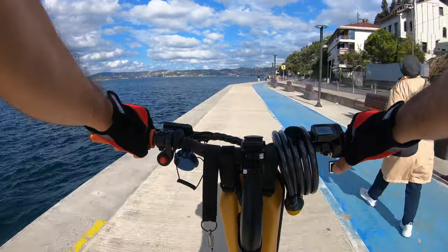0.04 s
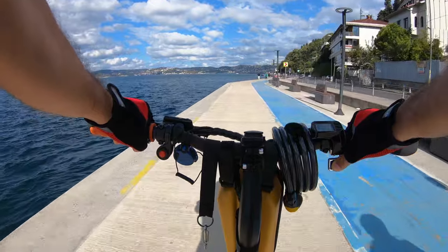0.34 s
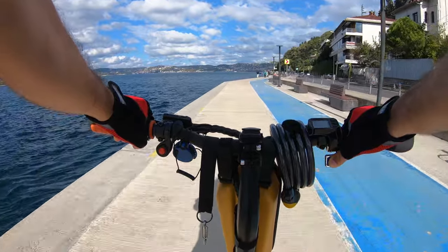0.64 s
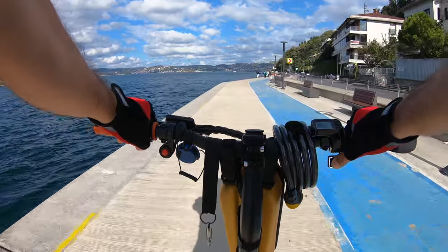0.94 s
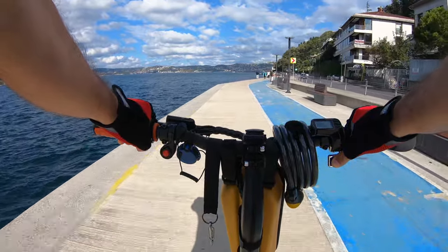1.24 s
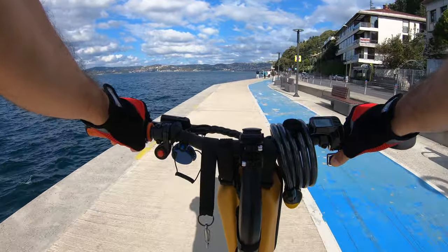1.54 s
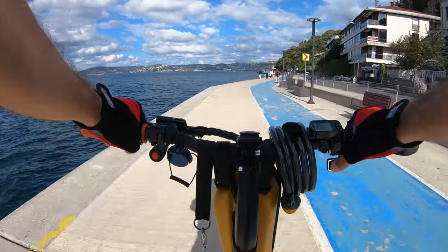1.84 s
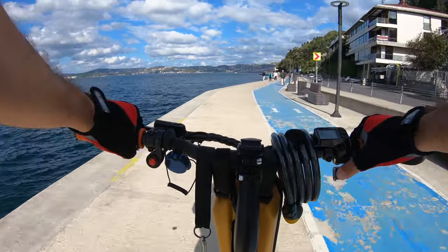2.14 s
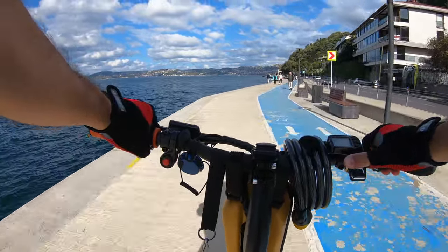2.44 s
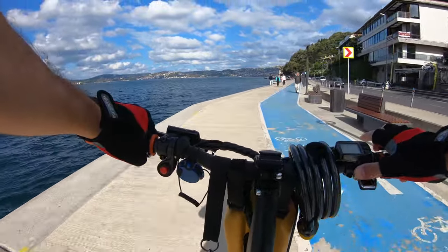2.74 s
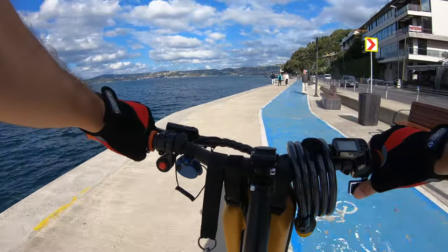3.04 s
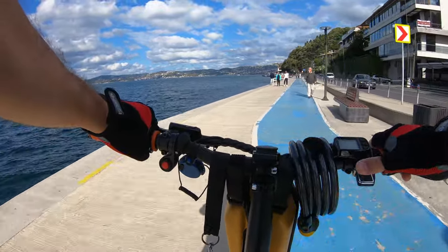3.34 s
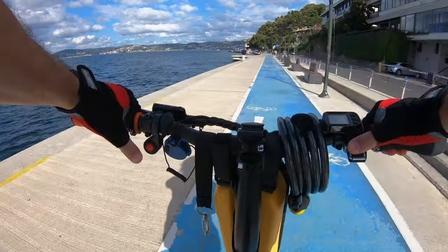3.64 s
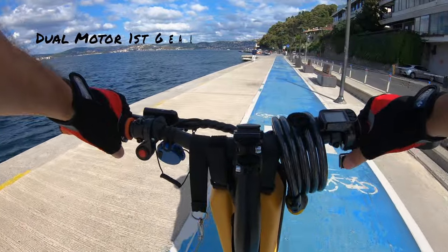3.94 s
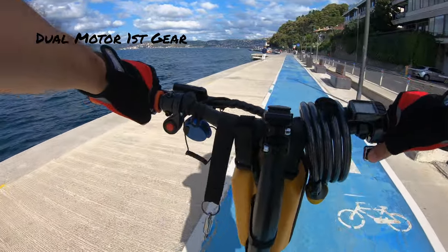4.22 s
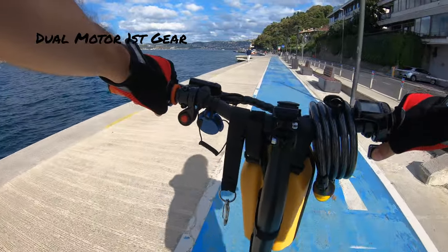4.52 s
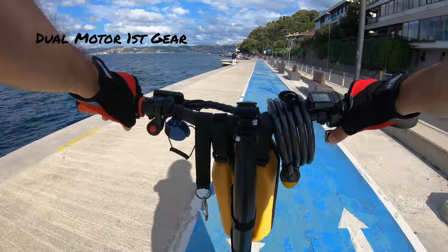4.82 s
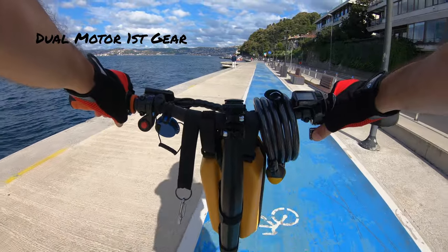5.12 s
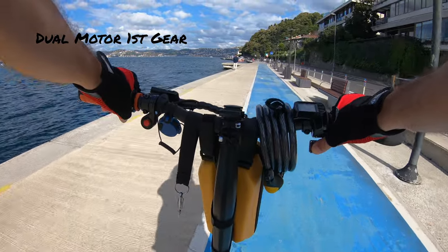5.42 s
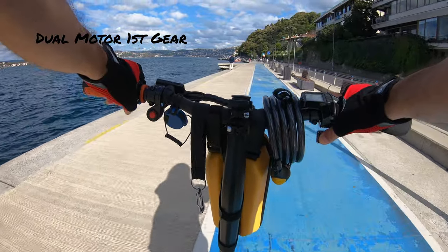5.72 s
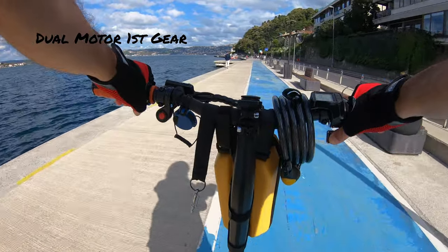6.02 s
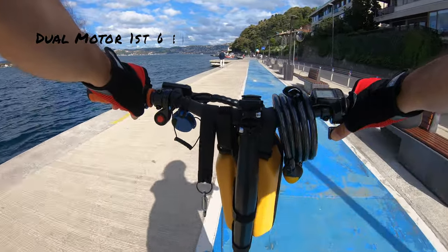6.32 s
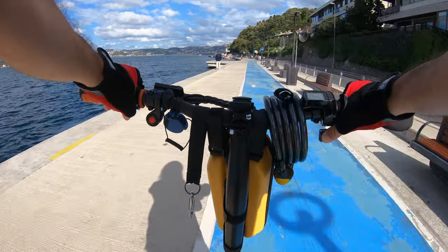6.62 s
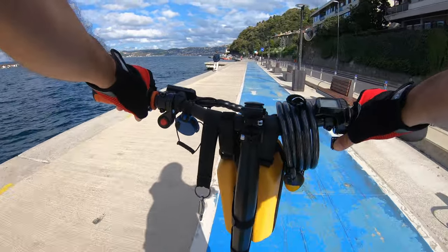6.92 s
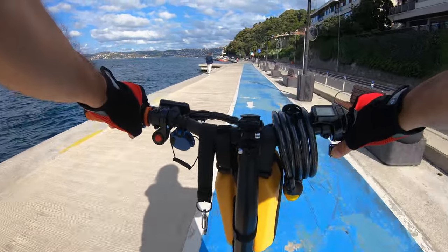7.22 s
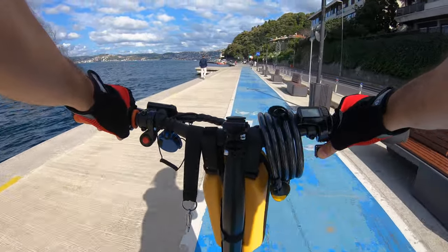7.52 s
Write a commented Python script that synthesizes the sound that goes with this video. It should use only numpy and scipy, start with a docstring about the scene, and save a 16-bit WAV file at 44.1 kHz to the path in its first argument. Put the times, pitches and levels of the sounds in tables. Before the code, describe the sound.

An electric scooter runs fast along an outdoor concrete path, heard from the rider's chest. Wind buffets the microphone with low thumps over a steady motor hum, thin gliding whines and tyre roar. About halfway, a sharp click cuts to ribbed concrete, where the frame drones and the tyres sing lower. Small metal parts clink and rattle lightly around the change, and the ride carries on.

```python
"""An electric scooter runs fast along a concrete seaside path, heard from the rider's chest.
From the start, wind buffets the microphone over humming hub motors, gliding whines and tyre roar.
Gusts thump, the running gear scrapes, handlebar fittings tick; from 3.1 s metal parts clink.
At 3.65 s the sound cuts with a click to a second stretch: ribbed concrete sets the frame droning,
the tyres sing lower and small parts rattle."""
import sys
import numpy as np
from scipy import signal
from scipy.fft import rfft, irfft
from scipy.io import wavfile
from scipy.ndimage import uniform_filter1d

SR = 44100
rng = np.random.default_rng(int(sys.argv[2]) if len(sys.argv) > 2 else 0)


def store_pcm(level_fs):
    """Save levels as 16-bit WAV."""
    pcm = np.round(np.clip(level_fs, -1, 1) * 32767).astype(np.int16)
    wavfile.write(sys.argv[1], SR, np.atleast_2d(pcm).T)


N = 338247
TIME_S = np.arange(N) / SR
FREQ_HZ = np.fft.rfftfreq(N, 1 / SR)
RIBBED_START_S = 3.65

# Table levels are relative; the functions add their own gains.
# airflow at the microphone: time_s, level_db
WIND_LEVEL = [(0, -24.5), (.25, -24.5), (.55, -26.5), (.8, -24.5), (1.1, -23), (1.6, -23), (1.8, -29),
              (2.15, -24.5), (2.35, -26), (2.8, -22), (3.2, -26.5), (3.65, -24.5), (3.8, -28), (4.3, -28.5),
              (4.7, -27), (4.93, -35.5), (5.25, -27), (5.7, -31), (5.95, -30.5), (6.15, -28), (6.9, -27.5),
              (7.5, -24.5), (7.67, -30)]
# eddy spectra, deeper on the smooth stretch: freq_hz, gain_db
SMOOTH_WIND_SPECTRUM = [(8, -15), (15, -1), (28, 2), (48, -2.5), (62, -9.5), (80, -12.5), (110, -11.5),
                        (135, -19.5), (160, -29), (250, -43.5)]
RIBBED_WIND_SPECTRUM = [(8, -13), (20, -9), (32, 2), (48, -0.5), (62, 0.5), (80, -2), (105, -5),
                        (135, -11.5), (160, -21), (250, -28.5)]
# hub motor hum: time_s, fundamental_db, octave_db
HUM_LEVELS = [(0, -21, -43.5), (.6, -21, -37), (.85, -29.5, -35), (1.6, -26, -44.5), (1.85, -24, -38.5),
              (2.38, -24.5, -34), (2.6, -30, -30), (3.3, -26, -33), (3.8, -21.5, -26), (4.0, -21.5, -26),
              (4.2, -23.5, -32), (4.45, -17.5, -35), (4.76, -16.5, -28.5), (4.95, -22.5, -42),
              (5.25, -18, -29), (5.6, -23, -33), (5.9, -23.5, -27.5), (6.3, -23, -30.5), (6.65, -21.5, -36),
              (6.97, -19, -24), (7.2, -23.5, -26), (7.45, -24.5, -26.5), (7.67, -30.5, -32)]
# tyre noise: time_s, rumble_db, song_db, hiss_db
SMOOTH_TYRE_LEVELS = [(0, -37.5, -40.5, -51.5), (.4, -42, -40, -53.5), (.9, -37, -36.5, -52),
                      (1.55, -38, -38.5, -51), (1.9, -42, -42, -54), (2.5, -37, -35.5, -51),
                      (2.9, -36.5, -34, -50), (3.3, -34, -33, -48), (3.65, -34, -35, -49)]
RIBBED_TYRE_LEVELS = [(3.65, -29, -45, -55.5), (4.05, -30.5, -44.5, -55), (4.2, -30.5, -44, -53.5),
                      (4.42, -32.5, -44.5, -53.5), (4.62, -32, -45, -55), (4.85, -37.5, -42.5, -54),
                      (4.98, -37, -51, -54), (5.45, -37.5, -46.5, -52), (5.7, -38, -46.5, -50.5),
                      (6.3, -35.5, -46, -48), (6.85, -36, -46.5, -46.5), (7.14, -36, -44.5, -46),
                      (7.195, -37, -49, -51), (7.25, -36, -41.5, -48), (7.42, -35.5, -43.5, -45.5),
                      (7.67, -35.5, -47, -48.5)]
# road rumble: freq_hz, gain_db
SMOOTH_RUMBLE_SPECTRUM = [(90, -1), (160, 1.5), (260, 0.5), (400, -4.5), (540, -4.5), (720, -15),
                          (1000, -20), (1600, -55.5)]
RIBBED_RUMBLE_SPECTRUM = [(90, 1.5), (160, 0), (260, 1), (400, -1.5), (490, -5), (560, -9), (720, -16.5),
                          (1000, -28), (1600, -50.5)]
# tread song: time_s, centre_hz
SMOOTH_SONG_PITCH = [(0, 1734), (1, 1702), (2.7, 1768), (3.15, 1731), (3.65, 1751)]
RIBBED_SONG_PITCH = [(3.65, 1034), (4.08, 985.6), (4.35, 919), (4.85, 958.5), (5.7, 935), (6.05, 1002),
                     (6.42, 970), (6.6, 1045), (6.9, 1022), (7.3, 970), (7.67, 998)]
# tyre hiss: freq_hz, gain_db
SMOOTH_HISS_SPECTRUM = [(500, 1), (800, 3.5), (1200, 8.5), (1900, 6), (2200, 3), (2420, 9.5), (2750, 0.5),
                        (3700, -1), (4400, -8), (4950, -8), (5900, -18), (7700, -21.5), (8900, -37),
                        (12500, -47)]
RIBBED_HISS_SPECTRUM = [(500, -12.5), (900, 3), (1300, 5), (1450, 1.5), (1680, 7), (2150, -2.5),
                        (2380, -1.5), (2650, -5.5), (3200, -5.5), (4700, -16), (5900, -27.5), (7600, -29.5),
                        (8700, -47), (12500, -52)]
# faint chatter of the fittings: time_s, level_db
CHATTER_LEVEL = [(0, -73.5), (3, -74.5), (3.64, -65), (3.67, -75), (3.95, -76.5), (4.02, -65), (4.1, -72),
                 (4.4, -70), (4.52, -71), (4.65, -74.5), (5.6, -70.5), (6.9, -66), (7.67, -64.5)]
# ticks of loose handlebar parts: start_s, level_db, hardness (0-1)
HANDLEBAR_TICKS = [(0.2344, -45, 0.05), (3.137, -44, .6), (3.2706, -48, .2), (3.4575, -51, .8),
                   (3.5134, -43, 0.8), (3.5423, -44, 0), (4.0064, -55, .1), (4.0238, -56, .4),
                   (4.045, -54, 0.5), (4.072, -56, .6), (4.1232, -56, .7), (4.135, -45, 0.4),
                   (4.17, -53, .6), (4.227, -55, .6), (4.296, -48, 0), (4.351, -56, .1), (4.3914, -50, .9),
                   (4.4963, -54, .8), (4.5077, -59, .9), (5.275, -57, .6), (5.4555, -56, .6),
                   (5.8243, -52.5, .5), (5.8377, -52, .5), (5.9494, -51, .4), (6.648, -54, 0.4),
                   (7.011, -52, .5), (7.2025, -54, .6)]
# soft and hard knocks on the fittings: freq_hz, gain_db
DULL_SPECTRUM = [(1200, -15), (2900, 0), (3500, -3), (4400, 1), (4830, 1), (5300, -9), (5900, -11.5),
                 (6700, -9), (7700, -12.5), (8800, -25.5), (12000, -37.5)]
CRISP_SPECTRUM = [(1200, -19), (3000, -4.5), (4800, 1.5), (5800, -2), (7500, 1.5), (8800, -14.5),
                  (11500, -19.5), (13500, -26.5)]
# motor and tyre whines, frame drones: start_s, end_s, first_hz, last_hz, level_db, roughness
WHINES_AND_DRONES = [(0.032, 0.332, 562, 523, -45, .2), (0.724, 1.0, 545, 560, -45.5, 0.1),
                     (0.699, 1.648, 312.5, 323.7, -46, 0.99), (0.722, 1.0, 1565, 1605, -44, .1),
                     (1.377, 1.62, 520, 566, -48, 0.1), (2.146, 3.62, 332.8, 338, -46, 0.95),
                     (2.3, 2.52, 1810, 1820, -46, 0.12), (2.494, 3.598, 652, 668, -50.5, 0.74),
                     (2.58, 3.296, 1795, 1780, -42.5, 0.01), (2.782, 3.02, 1730, 1700, -44, 0.13),
                     (3.25, 3.657, 1815, 1789, -40.5, 0.02), (3.637, 5.1, 180, 178.7, -38.5, 1.2),
                     (3.612, 4.5, 281, 285.6, -32, 1), (3.9, 4.854, 481.6, 474, -38.5, 0.32),
                     (3.899, 4.14, 993, 972, -44.5, 0.05), (4.073, 4.215, 224.5, 231.4, -26.5, 0.4),
                     (4.305, 4.39, 358.4, 366, -31, 0.5), (4.38, 4.58, 910, 928, -44.5, 0.28),
                     (4.483, 4.66, 293.4, 309, -32, 0.4), (4.3, 4.73, 390, 395, -40.5, 1),
                     (6, 7.671, 176.8, 179.4, -41.5, 0.28), (6.12, 7.45, 1662, 1685, -50.5, 0.08),
                     (6.551, 7.07, 1052, 1013, -47, 0.19), (6.602, 7.67, 355.3, 358.7, -47.5, 0.34),
                     (6.7, 6.9, 1450, 1460, -49, 0.02), (6.779, 7.52, 223.8, 245.8, -37, .2),
                     (6.85, 7.08, 1528, 1540, -52, 0.04), (6.897, 7.56, 556, 571, -47, 0.07),
                     (7.27, 7.46, 1216, 1240, -48, 0)]
# thumps of air: peak_s, length_s, level_db, pitch_hz
GUST_THUMPS = [(0.231, 0.06, -17.5, 33.9), (0.247, 0.034, -21, 85), (0.415, 0.08, -26, 36.8),
               (0.956, 0.055, -16, 35), (0.964, 0.035, -24, 70), (1.018, 0.029, -25, 105.6),
               (1.073, 0.087, -20, 28.2), (1.225, 0.047, -18, 35), (1.299, 0.03, -26, 99),
               (1.476, 0.055, -17.5, 72), (1.563, 0.064, -20.5, 36), (1.667, 0.026, -10, 72.7),
               (2.182, 0.03, -24.5, 110), (2.396, 0.022, -11.5, 84.9), (2.689, 0.051, -23.5, 118),
               (2.745, 0.072, -21, 38), (2.847, 0.097, -19, 33.1), (2.865, 0.022, -24, 109),
               (2.978, 0.055, -26, 32.75), (3.068, 0.027, -25, 109), (3.18, 0.026, -22, 114.6),
               (3.262, 0.025, -22.5, 109.2), (3.38, 0.06, -22, 30), (3.503, 0.038, -28, 124),
               (3.54, 0.063, -18.5, 34), (4.187, 0.046, -27, 150), (5.477, 0.046, -19.5, 105),
               (6.16, 0.038, -22, 90), (7.475, 0.042, -17.5, 85)]
# running gear rubs: start_s, end_s, first_hz, last_hz, width_hz, level_db, judder_db
GEAR_SCRAPES = [(0.699, 1.15, 2410, 2363, 120, -53.5, .5), (1.198, 1.65, 2430, 2440, 130, -55.5, -2),
                (2.27, 2.763, 2376, 2455, 60, -51, 0), (3.15, 3.648, 2460, 2440, 60, -56, .5),
                (3.525, 3.655, 4650, 4720, 1300, -51, 5), (3.98, 4.07, 3000, 3080, 1090, -58, 8),
                (4.335, 4.41, 3210, 3180, 1500, -58.5, 5)]
# strikes of small metal parts: start_s, level_db, pitch_hz
METAL_STRIKES = [(3.1375, -40, 4850), (3.999, -47, 4020), (4.011, -48, 2980), (4.034, -42, 2850),
                 (4.049, -41, 2900), (4.1235, -39, 2430), (4.1345, -43, 3730), (4.1355, -39, 4720),
                 (4.2985, -47, 4330), (4.35, -45, 2800), (4.377, -45, 2900), (4.4595, -48.5, 4100)]
# their modes: pitch_ratio, gain_db, t60_s
METAL_MODES = [(.61, -4, 0.035), (.82, -7, .025), (1, 1, 0.041), (1.05, -13, .045), (1.38, -13.5, .04),
               (1.62, -16, 0.032)]
# clicks at the cut between the stretches: start_s, level_db
CUT_CLICKS = [(3.646, -26), (3.65, -17), (3.6539, -20), (3.663, -25)]
# frame resonances: centre_hz, width_hz, gain_db
FRAME_MODES = [(237, 3.1, -5), (277.7, 9.2, 7), (354.5, 21, 6.5), (389, 17, 3), (477.3, 28, 7)]


def amp(db):
    """Decibels to gain."""
    return 10 ** (np.asarray(db) / 20)


def unit(x):
    """Scale to rms 1."""
    return x / np.sqrt(np.mean(x ** 2) + 1e-20)


def follow(rows):
    """Each column of a time table at every sample."""
    times_s, *columns = np.transpose(rows)
    return [np.interp(TIME_S, times_s, column) for column in columns]


def shape(spectrum):
    """Gain per frequency bin, falling steeply past the last point."""
    hz, db = np.transpose(spectrum)
    gain = amp(np.interp(np.log(FREQ_HZ + 1), np.log(hz), db))
    return gain / np.maximum(FREQ_HZ / hz[-1], 1) ** 5


def noise(gain):
    """Noise shaped by a gain per bin, rms 1."""
    return unit(irfft(rfft(rng.standard_normal(N)) * gain, N))


def drift(rate_hz):
    """Random wander up to about rate_hz, rms 1."""
    return noise(1 / (1 + (FREQ_HZ / rate_hz) ** 4))


def steadied(x, span_s):
    """Level out slow swells, keep fast grain."""
    size = int(span_s * SR)
    power = uniform_filter1d(uniform_filter1d(x ** 2, size), size)
    return x / np.sqrt(abs(power) + 1e-9)


def add(mix, start_s, sound):
    """Mix a sound in at start_s."""
    part = mix[round(start_s * SR):][:len(sound)]
    part += sound[:len(part)]


def noise_band(centre_curve, width_hz, skirt):
    """Noise around a moving centre: a tread pumping air, or a part rubbing."""
    phase = 2 * np.pi * np.cumsum(follow(centre_curve)[0]) / SR
    gain = 1 / np.sqrt(1 + (2 * FREQ_HZ / width_hz) ** skirt)
    return unit(noise(gain) * np.cos(phase) + noise(gain) * np.sin(phase))


def wind(spectrum, gain_db=3.0, swell_hz=3):
    """Eddies push on the microphone in short swells."""
    level_db = follow(WIND_LEVEL)[0] + gain_db + drift(swell_hz)
    return amp(level_db) * steadied(noise(shape(spectrum)), span_s=0.084)


def hub_motors(cruise_hz=62.42, ribbed_rise_hz=0.896, waver=0.0081):
    """The hubs hum on one note and its octave, shaken by the road."""
    low_db, octave_db = follow(HUM_LEVELS)
    low_db = low_db - 0.5 - 0.55 * drift(3.2)
    octave_db = octave_db - 2.5 + 0.5 * drift(1.2)
    pitch_hz = (cruise_hz + ribbed_rise_hz * (TIME_S > RIBBED_START_S)) * (1 + waver * drift(9.4))
    phase = 2 * np.pi * np.cumsum(pitch_hz) / SR
    low = amp(low_db + 1.5 * drift(24)) * np.sin(phase + 0.19 * drift(51))
    octave = amp(octave_db + 1.6 * drift(29)) * np.sin(2 * phase + 0.51 * drift(7))
    return np.sqrt(2) * (low + octave)


def tyre_hiss(spectrum, grain_db):
    """Hiss made grainy by grit under the wheels."""
    grit = rng.standard_normal(N) * amp(grain_db * drift(450) + 0.5 * drift(17))
    return unit(irfft(rfft(grit) * shape(spectrum), N))


def smooth_stretch(song_gain_db=-3, hiss_gain_db=8, core_db=-11):
    """On smoother paving the tyres sing high over rumble and hiss."""
    rumble_db, song_db, hiss_db = follow(SMOOTH_TYRE_LEVELS)
    rumble = amp(rumble_db + 1.1 * drift(30)) * noise(shape(SMOOTH_RUMBLE_SPECTRUM))
    band = noise_band(SMOOTH_SONG_PITCH, width_hz=384, skirt=4.34)
    core = amp(core_db) * noise_band(SMOOTH_SONG_PITCH, width_hz=150, skirt=4.6)
    song = amp(song_db + song_gain_db + 0.8 * drift(40)) * unit(band + core)
    hiss = amp(hiss_db + hiss_gain_db) * tyre_hiss(SMOOTH_HISS_SPECTRUM, grain_db=2.05)
    return rumble + song + hiss


def rattle(tick_gain_db=-4, chatter_per_s=300, spread_db=4.5, snap_s=0.0016, settle_s=0.0084):
    """Handlebar fittings tick amid faint chatter; each knock snaps, then buzzes as the part settles."""
    scatter_db = spread_db * np.minimum(rng.standard_normal(N), 2)
    hits = rng.random(N) < chatter_per_s / SR
    dull = hits * amp(follow(CHATTER_LEVEL)[0] + scatter_db)
    crisp = np.zeros(N)
    for start_s, level_db, hardness in HANDLEBAR_TICKS:
        impulse = amp([level_db + tick_gain_db])
        add(dull, start_s, impulse * np.sqrt(1 - hardness))
        add(crisp, start_s, impulse * np.sqrt(hardness))
    t = np.arange(SR // 20) / SR
    attack = 1 - np.exp(-t / 0.00014)
    envelope = attack * (np.exp(-t / snap_s) + 0.24 * np.exp(-t / settle_s))
    return sum(signal.oaconvolve(knocks, envelope)[:N] * noise(shape(spectrum))
               for knocks, spectrum in ((dull, DULL_SPECTRUM), (crisp, CRISP_SPECTRUM)))


def whines_and_drones(gain_db=-2, waver=0.0041, rough_waver=0.02, flutter_db=1.5, rough_flutter_db=2.5):
    """Gliding motor and tyre whines, and steady frame drones; the road shakes rough ones to a growl."""
    out, sway, shake = np.zeros(N), drift(26), drift(27)
    for start_s, end_s, first_hz, last_hz, level_db, roughness in WHINES_AND_DRONES:
        progress = np.linspace(0, 1, round((end_s - start_s) * SR))
        span = (np.arange(len(progress)) + int(rng.random() * N)) % N  # own part of each drift
        arch = (4 * progress * (1 - progress)) ** 0.29
        glide_hz = first_hz + (last_hz - first_hz) * progress
        pitch_hz = glide_hz * (1 + (waver + roughness * rough_waver) * sway[span])
        flutter = unit(amp((flutter_db + roughness * rough_flutter_db) * shake[span]))
        tone = np.sqrt(2) * np.sin(2 * np.pi * np.cumsum(pitch_hz) / SR)
        add(out, start_s, amp(level_db + gain_db) * arch * flutter * tone)
    return out


def gusts(swirl=0.64):
    """The hardest eddies: brief swings of pressure with turbulence around them."""
    out = np.zeros(N)
    for (peak_s, length_s, level_db, pitch_hz), turn in zip(GUST_THUMPS, rng.random(len(GUST_THUMPS))):
        swing = np.sin(2 * np.pi * (pitch_hz * TIME_S + turn))
        ratio = FREQ_HZ / pitch_hz
        turbulence = steadied(noise(ratio ** 2 / (1 + ratio ** 4.72)), span_s=0.037)
        envelope = np.exp(-(2 * (TIME_S - peak_s) / length_s) ** 2)
        out += amp(level_db) * envelope * (swing + swirl * turbulence)
    return out


def scrapes(judder_hz=140):
    """Running gear rubs lightly: a gliding, juddering band of noise."""
    out, judder = np.zeros(N), drift(judder_hz)
    for start_s, end_s, first_hz, last_hz, width_hz, level_db, judder_db in GEAR_SCRAPES:
        progress = np.clip((TIME_S - start_s) / (end_s - start_s), 0, 1)
        swell = np.sqrt(np.sin(np.pi * progress))
        band = noise_band([(start_s, first_hz), (end_s, last_hz)], width_hz, skirt=5)
        out += amp(level_db) * swell * unit(amp(judder_db * judder)) * band
    return out


def clinks(attack_s=0.0003, contact_s=0.001, free_ring=0.22):
    """Small metal parts collide: a bright flash damped by the contact, then a short ring."""
    out, t = np.zeros(N), np.arange(SR // 12) / SR
    attack = 1 - np.exp(-(t / attack_s) ** 2)
    for start_s, level_db, pitch_hz in METAL_STRIKES:
        for pitch_ratio, gain_db, t60_s in METAL_MODES:
            decay = np.exp(-t / contact_s) + free_ring * amp(-60 * t / t60_s)
            mode = np.sin(2 * np.pi * pitch_hz * pitch_ratio * t)
            add(out, start_s, amp(level_db + gain_db) * attack * decay * mode)
    return out


def cut_clicks(decay_s=0.002):
    """Short, sharp clicks where the sound cuts abruptly to the second stretch."""
    out, t = np.zeros(N), np.arange(SR // 50) / SR
    for start_s, level_db in CUT_CLICKS:
        add(out, start_s, amp(level_db) * np.exp(-t / decay_s))
    return out


def ribbed_stretch(rumble_gain_db=0.48, song_gain_db=-2.5, hiss_gain_db=3.5, core_db=-4):
    """Ribbed concrete shakes the frame into resonance; the tyres sing lower, with a narrow core."""
    rumble_db, song_db, hiss_db = follow(RIBBED_TYRE_LEVELS)
    frame_power = sum(amp(gain_db) ** 2 / (1 + (2 * (FREQ_HZ - centre_hz) / width_hz) ** 2) ** 2
                      for centre_hz, width_hz, gain_db in FRAME_MODES)
    drone = noise(shape(RIBBED_RUMBLE_SPECTRUM) * np.sqrt(1 + frame_power))
    rumble = amp(rumble_db + rumble_gain_db) * steadied(drone, span_s=0.11)
    band = noise_band(RIBBED_SONG_PITCH, width_hz=193, skirt=3.7)
    core = amp(core_db) * noise_band(RIBBED_SONG_PITCH, width_hz=56, skirt=2.6)
    song = amp(song_db + song_gain_db + drift(21)) * (band + core)
    hiss = amp(hiss_db + hiss_gain_db) * tyre_hiss(RIBBED_HISS_SPECTRUM, grain_db=1.5)
    return rumble + song + hiss


def scene():
    """Mono mix. Motors run throughout; wind and tyres switch together between the stretches."""
    blend = np.clip((TIME_S - RIBBED_START_S) * SR / 128, 0, 1)  # 3 ms crossfade
    smooth = smooth_stretch() + wind(SMOOTH_WIND_SPECTRUM)
    ribbed = ribbed_stretch() + wind(RIBBED_WIND_SPECTRUM)
    scooter = hub_motors() + whines_and_drones() + rattle() + clinks() + scrapes()
    return ((1 - blend) * smooth + blend * ribbed + gusts() + scooter + cut_clicks())[None]


def record(dry):
    """Ease both ends, then low-pass."""
    cutoff_hz = 15800
    eased = dry * signal.windows.tukey(N, 0.001)
    lowpass = signal.firwin(511, cutoff_hz, window=("kaiser", 9), fs=SR)
    return signal.oaconvolve(eased, lowpass[None], "same")


dry = scene()
out = record(dry)
store_pcm(out)
```